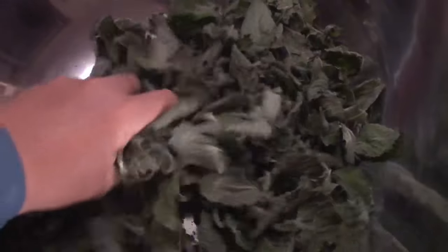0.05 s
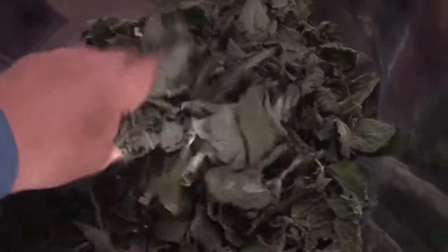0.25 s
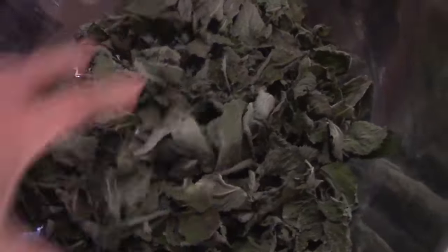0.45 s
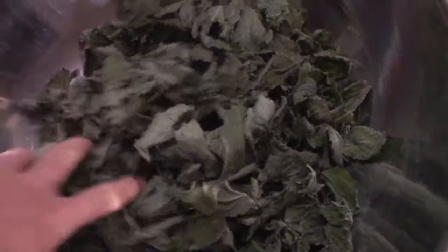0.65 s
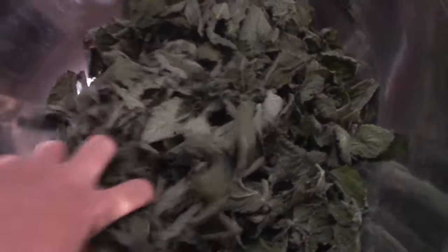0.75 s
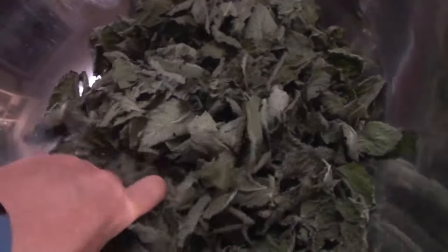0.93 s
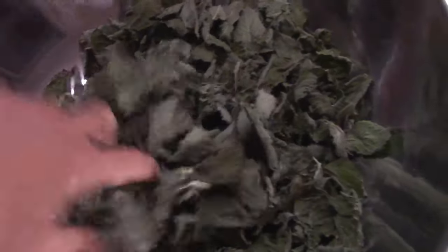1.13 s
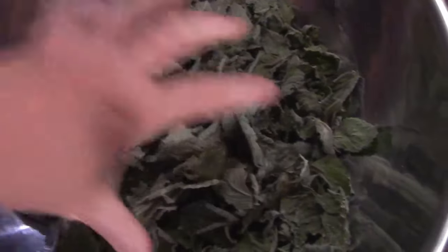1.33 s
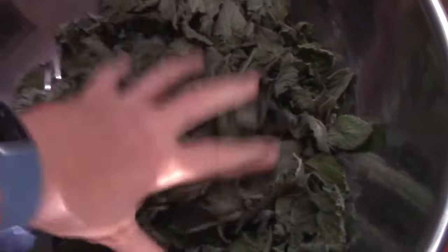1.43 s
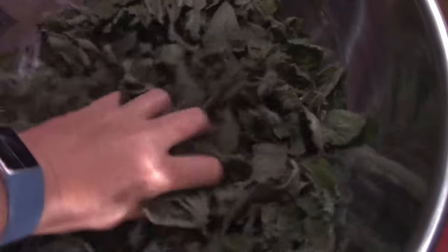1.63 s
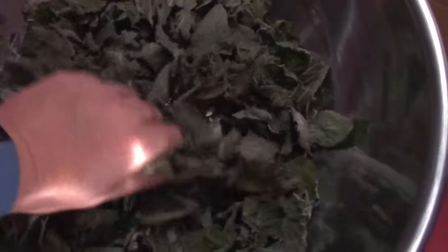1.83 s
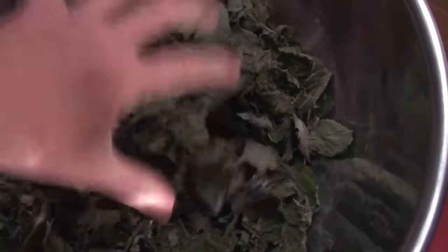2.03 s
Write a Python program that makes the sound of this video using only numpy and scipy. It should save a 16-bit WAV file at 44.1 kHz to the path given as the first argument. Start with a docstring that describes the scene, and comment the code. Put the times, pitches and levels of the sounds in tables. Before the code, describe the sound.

Dry leaves crunch under a hand in a metal bowl: three dense crackling squeezes with sparse snaps and quiet settling between, then a faint last stir, close microphone, low kitchen murmur beneath.

```python
"""A hand crushes dry leaves in a metal bowl: three squeezes and a last stir, with quieter settling between.
Thousands of short damped rings, in deep, bright and fine bands over noise, make the crunch.
A kitchen murmur, filtered noise with an unsteady hum, lies under it; its bass swells and dips.
The hand bumps the bowl (low decaying tones) and stems snap (clicks with noise bursts).
The bowl answers each snap with a very short noise tail."""
import sys
import numpy as np
from scipy import signal
from scipy.fft import rfft, irfft, next_fast_len
from scipy.io import wavfile
from scipy.ndimage import uniform_filter1d, minimum_filter1d, map_coordinates

SR = 44100
rng = np.random.default_rng(int(sys.argv[2]) if len(sys.argv) > 2 else 0)


def ratio(d):
    """dB to gain"""
    e = np.asarray(d, float) / 20
    return 10 ** e


def persist_wave(psi):
    """Save psi, clipped to +-1, as 16-bit WAV."""
    counts = np.round(np.clip(psi, -1, 1) * 32767).astype(np.int16)
    wavfile.write(sys.argv[1], SR, np.atleast_2d(counts).T)


N = 91683

MAX_CRACKS_PER_S = 4500
SIZE_SPREAD_DB, PITCH_SPREAD_OCTAVES = 20, 0.64
LIFE_CYCLES = 2.47  # cycles in which a ring falls by e^-3
THIN_DB_PER_DB = 0.2  # a weaker squeeze breaks fewer leaves: count over level
CLUMP_DB = 1.38
RUSTLE_DB = -2  # over the cracks
LEAF_LOW_HZ = 440  # the crunch falls away below this
ROOM_DB, HUM_DB = 3.5, -9.5  # over the murmur level
HUM_HZ = 117
BUMP_T60_S, BUMP_RISE_S = 0.1, 0.0059
SNAP_T60_S, SNAP_CLICK_DB, SNAP_NOISE_DB = 0.011, 1, -7
SNAP_LATE_S = 0.001  # from first give to the crack
BOWL_DB = -11.5
LOW_CUT_HZ = 65
CEILING_DB, LIMIT_S = -9, 0.002


def unit(x):
    """Scale to rms 1."""
    return x / np.sqrt(np.mean(x ** 2) + 1e-20)


def along(points, hz):
    """Interpolate (Hz, value) points on a log frequency axis."""
    f, v = np.transpose(points)
    return np.interp(np.log(hz + 1), np.log(f + 1), v)


def wobble(knots_per_s):
    """Smooth random curve through normally distributed knots."""
    knots = rng.standard_normal(N // 20)
    return map_coordinates(knots, [np.arange(N) * knots_per_s / SR])


def filtered(x, response):
    """Multiply the spectrum of x by a response of frequency."""
    m = next_fast_len(N + 8192)
    return irfft(rfft(x, m) * response(np.fft.rfftfreq(m, 1 / SR)), m)[..., :N]


def recoloured(x, spectrum):
    """Flatten the broad colour of x, then give it the spectrum; rms 1."""
    hz, power = signal.welch(x, SR, nperseg=256)
    own = np.sqrt(uniform_filter1d(power, size=5) + 1e-4 * power.max())
    return unit(filtered(x, lambda f: ratio(along(spectrum, f)) / np.interp(f, hz, own)))


def fractures(centre_hz, effort_db, clumps_db):
    """Short damped rings at random moments, sizes and pitches; sparser when the effort is low."""
    count = int(MAX_CRACKS_PER_S * N / SR)
    u, g = rng.random((count, 4)), rng.standard_normal(count)
    at = (u[:, 0] * (N - 1)).astype(int)

    # share of the cracks that sound; the rest are faded to zero
    share = np.clip(ratio(THIN_DB_PER_DB * (effort_db - effort_db.max() + 3.5)), 0.06, 1)[at]
    sounding = np.clip((share - u[:, 2]) * 20, 0, 1) / np.sqrt(share)
    size = sounding * ratio(-SIZE_SPREAD_DB * u[:, 1] + clumps_db[at])
    signed_size = (size * np.sign(u[:, 3] - 0.5))[:, None]

    hz = np.clip(centre_hz * 2 ** (PITCH_SPREAD_OCTAVES * g), 300, 17000)[:, None]
    k = np.arange(96)
    decay = np.exp(-3 * hz * k / SR / LIFE_CYCLES)
    ring = signed_size * np.sin(2 * np.pi * hz * k / SR) * decay
    return np.bincount((at[:, None] + k).ravel(), ring.ravel(), minlength=N + 96)[:N]


def leaves():
    """Deep, bright and fine fractures over a smooth rustle, all following the squeeze."""
    # three squeezes and the last stir, one list each:
    # start_s, bright_level_db, deep_over_bright_db, fine_over_bright_db
    squeezes = [
        [(0.0, -20, -1, -12), (0.18, -23.5, -2.5, -13), (0.21, -26.5, -5, -7), (0.244, -38, -2.5, -6),
         (0.298, -32.5, -1.5, -5.5), (0.358, -40.5, 1, -7), (0.452, -40.5, 1.5, -15.5)],
        [(0.478, -45, 7.5, -10), (0.492, -41, -6, -18), (0.542, -44, 6, -14), (0.554, -43, -0.5, -28),
         (0.57, -29.5, 1, -13), (0.614, -41.5, 2, -12), (0.756, -22, -3, -8.5), (0.868, -23, -3.5, -12.5),
         (0.988, -23, -5, -8), (0.994, -19.5, -10, -16), (1.012, -29.5, -4.5, -9), (1.038, -23, -6, -8.5),
         (1.092, -26.5, -7, -9), (1.13, -36.5, -5, -12)],
        [(1.14, -36.5, -1, -10), (1.232, -45, 0.5, -11), (1.284, -55, 3, -12), (1.29, -46, 5.5, -3),
         (1.312, -56.5, 0.5, -19), (1.426, -59.5, 7.5, -10), (1.454, -34, -10, -6), (1.484, -22.5, -3.5, -15),
         (1.588, -20.5, -2, -10.5), (1.732, -22.5, -2.5, -12.5), (1.738, -20.5, -4, -11.5),
         (1.8, -29.5, -2.5, 0)],
        [(1.81, -31, -3.5, -11), (1.84, -32, -5.5, -9), (1.858, -43, -2.5, -8), (1.932, -36, -1, -6.5),
         (2.046, -51.5, -1.5, -10), (2.07, -44, -6, -12)],
    ]
    # crackle colours: frequency_hz, density_db (per Hz)
    bright_colour = [(2470, -17), (4200, -18), (4790, -10.5), (5340, -7.5), (6880, -4), (10000, -13),
                     (13000, -23), (22000, -120)]
    deep_colour = [(290, -49), (500, -9.5), (585, -15.5), (785, -2.5), (934, -8), (1120, -4.5),
                   (1390, -6.5), (1590, -4), (3380, -0.5), (4500, -6), (5850, -18), (9900, -120)]
    fine_colour = [(5590, -28), (9500, -0.5), (12600, -2.5), (13600, -7), (15100, -4.5), (15700, -24.5)]

    s, *cols = np.vstack(squeezes).T
    level_db, deep_db, fine_db = [np.interp(np.arange(N) / SR, s, c) for c in cols]
    clumps_db = CLUMP_DB * (wobble(30.64) + 0.64 * wobble(120) + 0.2 * wobble(400))
    bands = ((deep_colour, 2200, deep_db), (bright_colour, 6800, 0), (fine_colour, 12000, fine_db))
    out = 0
    for colour, centre_hz, over_db in bands:
        own_db = clumps_db + 1.38 * wobble(39.82)
        cracks = recoloured(fractures(centre_hz, level_db, own_db), colour)
        rustle = recoloured(rng.standard_normal(N) * ratio(0.39 * own_db), colour)
        out = out + ratio(level_db + over_db) * unit(cracks + ratio(RUSTLE_DB) * rustle)
    return filtered(out, lambda f: 1 / (1 + (LEAF_LOW_HZ / (f + 1)) ** 6))


def kitchen():
    """Dull noise murmur with a slightly unsteady hum; its bass swells and dips, its upper part stays."""
    # low murmur: time_s, level_db
    murmur_levels = [(0.0, -48), (0.06, -48), (0.12, -51), (0.15, -44), (0.18, -56), (0.22, -36.5),
                     (0.29, -52), (0.36, -42.5), (0.51, -45.5), (0.55, -38.5), (0.6, -42), (0.72, -42),
                     (0.74, -39), (0.79, -49), (0.89, -52), (1.01, -43), (1.35, -43.5), (1.46, -46),
                     (1.52, -40.5), (1.73, -62), (1.76, -47), (1.94, -48), (1.96, -43), (2.07, -46)]
    # murmur colour: frequency_hz, density_db (per Hz)
    room_colour = [(20, -47), (50, -16.5), (110, -11.5), (180, -6.5), (380, -6), (700, -8), (1400, -13),
                   (3000, -23), (8000, -50), (16000, -68)]

    level_db = np.interp(np.arange(N) / SR, *np.transpose(murmur_levels))
    murmur = unit(filtered(rng.standard_normal(N), lambda f: ratio(along(room_colour, f))))
    low = filtered(murmur, lambda f: 1 / (1 + (f / 500) ** 4))
    hum_phase = 2 * np.pi * np.cumsum(HUM_HZ + 3 * wobble(12)) / SR
    hum = np.sin(hum_phase) * ratio(HUM_DB + 2 * wobble(14))
    upper = ratio(level_db.mean() + ROOM_DB) * (murmur - low)
    return ratio(level_db) * (ratio(ROOM_DB) * low + hum) + upper


def bumps():
    """Hand on the bowl: soft dull thumps of two decaying partials."""
    # start_s, level_db, pitch_hz
    bump_events = [(0.199, -39, 198), (0.535, -38, 174), (0.543, -28, 125), (0.599, -46, 173),
                   (0.718, -36, 130), (0.829, -38, 67.3), (1.028, -37, 161), (1.817, -43, 119)]

    out, t = np.zeros(N + SR), np.arange(SR // 4) / SR
    for s, db, pitch_hz in bump_events:
        ring = np.sin(2 * np.pi * pitch_hz * t)
        ring += 0.33 * np.sin(2 * np.pi * 1.9 * pitch_hz * t + rng.uniform(0, 7.6))
        rise = 1 - np.exp(-t / BUMP_RISE_S)
        out[round(s * SR):][:len(t)] += ratio(db - 60 * t / BUMP_T60_S) * rise * ring
    return out[:N]


def snaps():
    """Each stem breaks with a click and a short wide noise burst about its pitch."""
    # start_s, level_db, pitch_hz, width_octaves
    snap_events = [(0.4044, -20.5, 6580, 0.8), (0.4409, -22, 6940, 0.8), (0.4605, -14, 6230, 0.43),
                   (0.4974, -32, 7340, 0.8), (0.5222, -27, 9480, 0.62), (0.5354, -37, 6640, 0.8),
                   (0.564, -19, 6770, 0.67), (0.5914, -20, 6580, 1), (0.6175, -25.5, 6680, 0.8),
                   (0.6354, -29, 7850, 0.8), (0.6504, -23.5, 7120, 0.69), (0.6833, -12, 5870, 0.8),
                   (0.695, -10.5, 6100, 0.8), (0.7459, -9, 6630, 0.65), (0.7994, -26, 6810, 0.8),
                   (1.0261, -10, 8000, 0.42), (1.0864, -16, 7220, 0.8), (1.154, -22, 6860, 0.9),
                   (1.2077, -29, 7230, 0.8), (1.222, -36, 6050, 0.8), (1.2371, -26, 9440, 0.53),
                   (1.2764, -44, 7340, 0.8), (1.2903, -28, 7310, 0.67), (1.3084, -36, 8360, 0.74),
                   (1.3548, -30.5, 5560, 0.94), (1.3774, -47, 6650, 0.8), (1.383, -40, 9850, 0.8),
                   (1.4828, -8, 6280, 0.91), (1.8594, -44, 6210, 0.8), (1.9214, -22, 7350, 0.9),
                   (2.03, -32, 7420, 0.8)]

    out, t = np.zeros(N + SR), np.arange(1024) / SR
    hz = np.fft.rfftfreq(len(t), 1 / SR)
    for s, db, pitch_hz, octaves in snap_events:
        band = np.exp(-(np.log2(hz / pitch_hz + 1e-9) / max(octaves, 0.2)) ** 2)
        noise = unit(irfft(rfft(rng.standard_normal(len(t))) * band))
        burst = noise * ratio(SNAP_NOISE_DB - 60 * t / SNAP_T60_S)
        click = ratio(SNAP_CLICK_DB) * np.sin(2 * np.pi * pitch_hz * t) * np.exp(-1.5 * pitch_hz * t)
        out[round((s + SNAP_LATE_S) * SR):][:len(t)] += ratio(db) * (burst + click)
    return out[:N]


def bowl(x):
    """The bowl throws a sound back for a few hundredths of a second: noise decaying by frequency."""
    # frequency_hz, t60_s
    bowl_decay = [(500, 0.055), (3000, .04), (12000, 0.027)]

    hz, t, z = signal.stft(rng.standard_normal(SR // 8), SR, nperseg=128)
    decay = ratio(-60 * t / along(bowl_decay, hz)[:, None])
    tail = signal.istft(z * decay, SR, nperseg=128)[1]
    return signal.fftconvolve(x, tail / np.linalg.norm(tail))[:N]


def scene():
    """One microphone feeds both channels; only the snaps excite the bowl's answer."""
    near = snaps()
    mono = leaves() + near + ratio(BOWL_DB) * bowl(near) + bumps() + kitchen()
    return np.array([mono, mono])


def low_pass(x):
    """Removes everything above the highest recorded frequency."""
    return signal.sosfilt(signal.butter(12, 16260, fs=SR, output="sos"), x)


def record(dry):
    """A fast peak limiter, a low cut and a slightly different colour per channel."""
    # frequency_hz, left_over_right_db
    channel_tilt = [(60, 7), (99, 1.5), (160, 4), (270, 2.5), (450, 3), (740, 2.5), (1220, 2.0),
                    (2010, 1.5), (3330, 1.5), (5500, 1.5), (9080, 3), (15000, 1.5)]

    span = int(LIMIT_S * SR)
    need = np.minimum(ratio(CEILING_DB) / (np.abs(dry[0]) + 1e-9), 1)
    gain = uniform_filter1d(minimum_filter1d(need, size=2 * span), size=span)

    def channel_response(f):
        """Half the level difference to each side, times the low cut."""
        colour = ratio(np.outer([0.5, -0.5], along(channel_tilt, f)))
        return colour * (f / np.hypot(f, LOW_CUT_HZ)) ** 2

    return low_pass(filtered(dry * gain, channel_response))


dry = scene()
out = record(dry)
persist_wave(out)
```